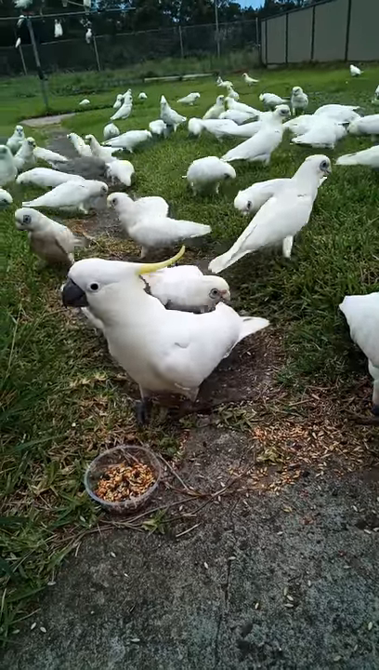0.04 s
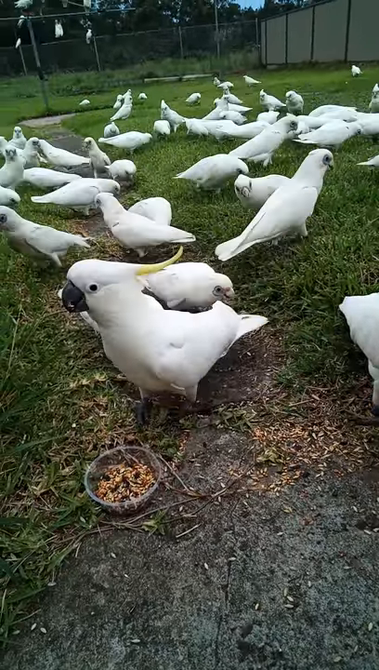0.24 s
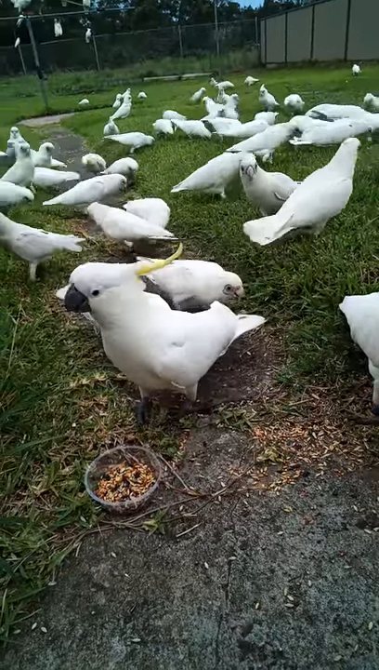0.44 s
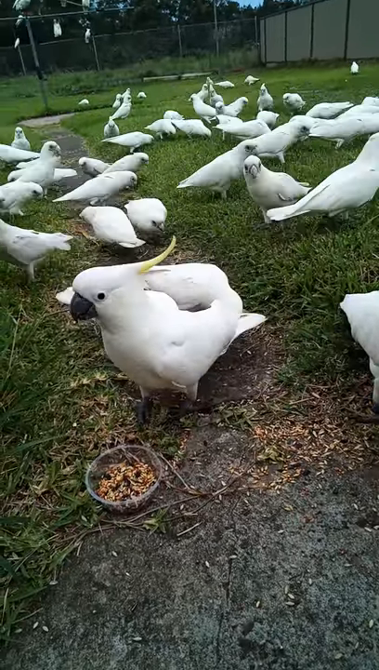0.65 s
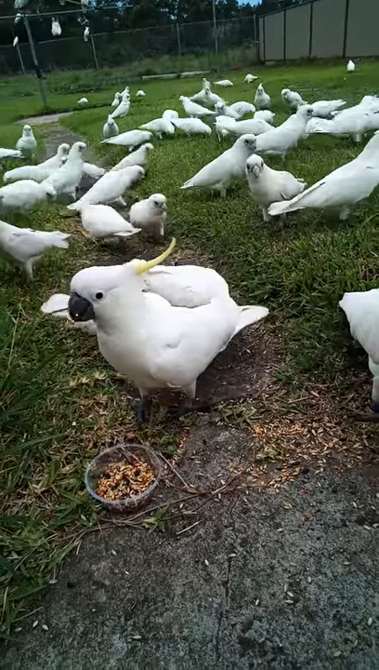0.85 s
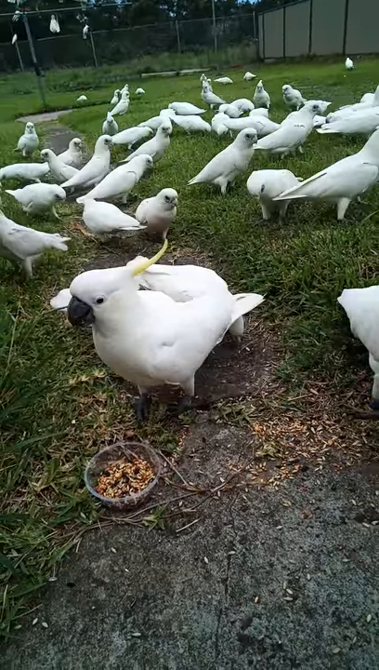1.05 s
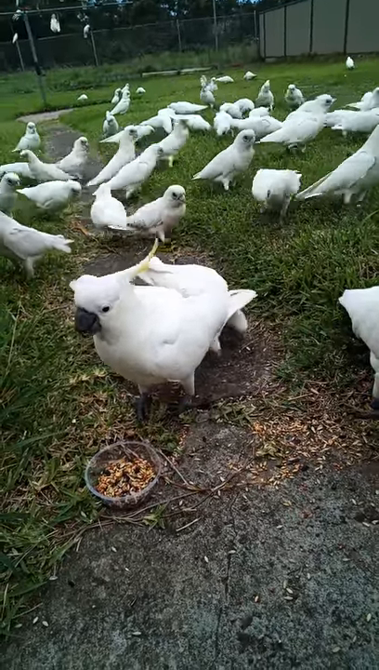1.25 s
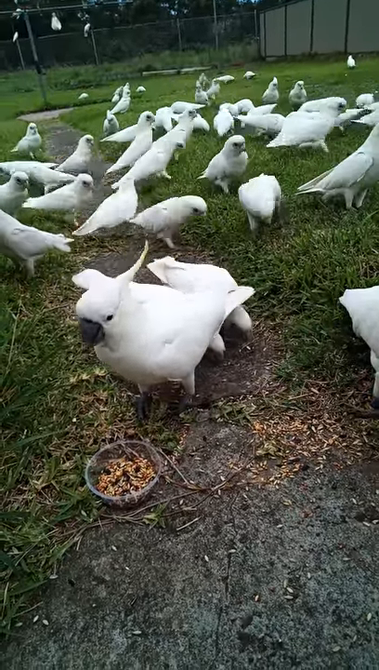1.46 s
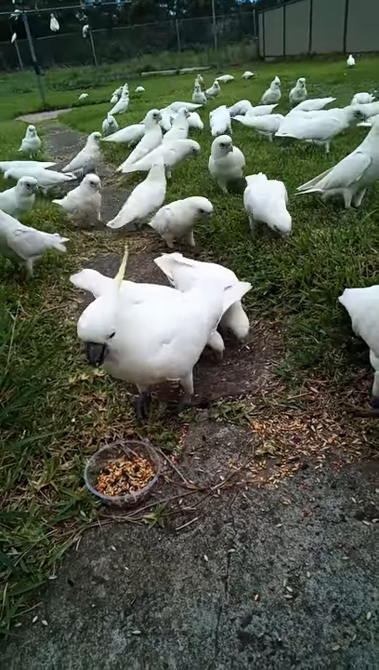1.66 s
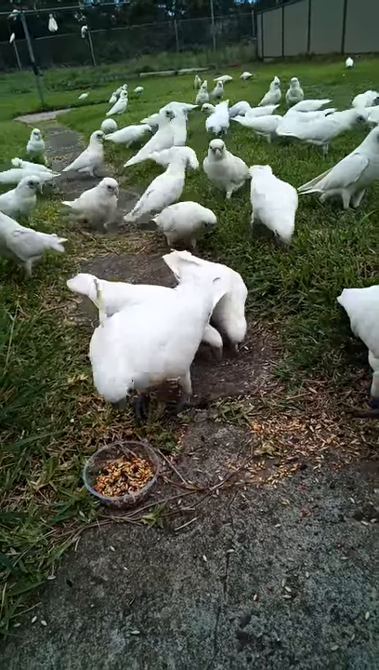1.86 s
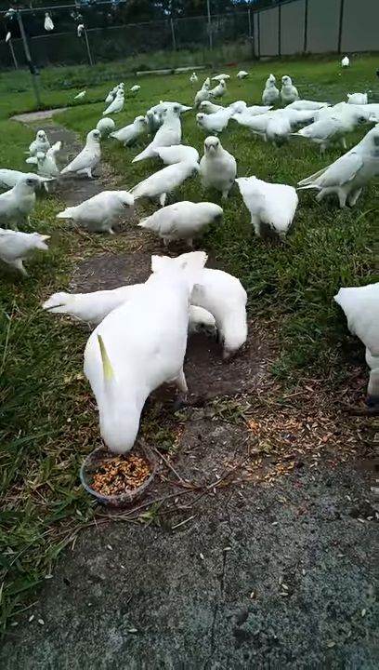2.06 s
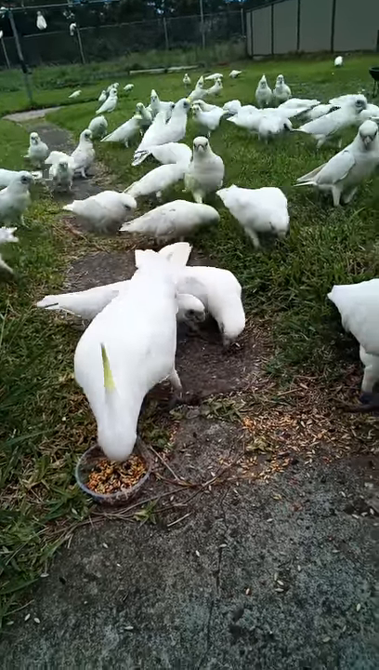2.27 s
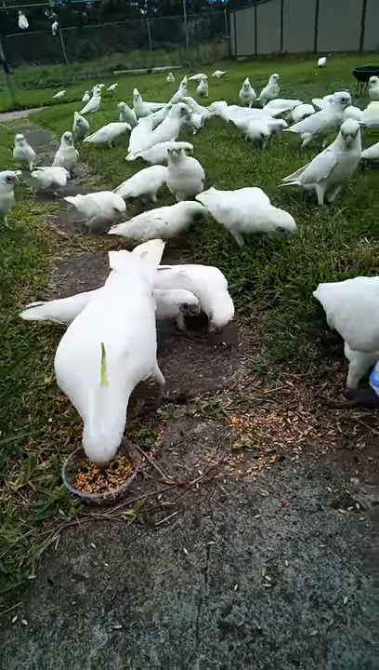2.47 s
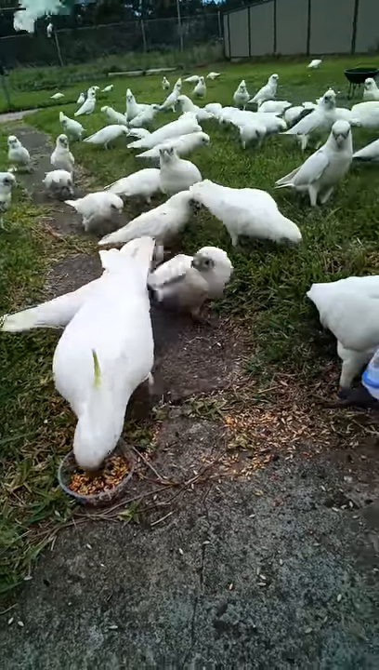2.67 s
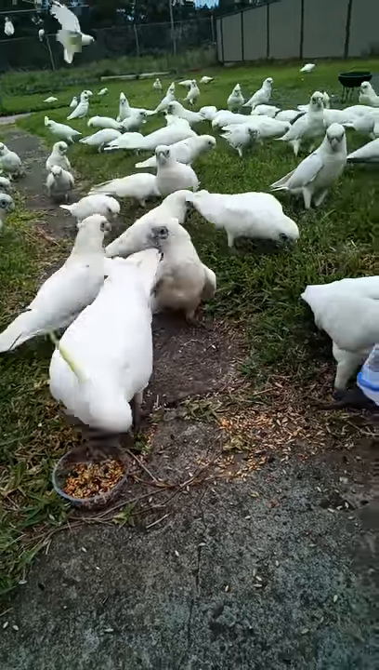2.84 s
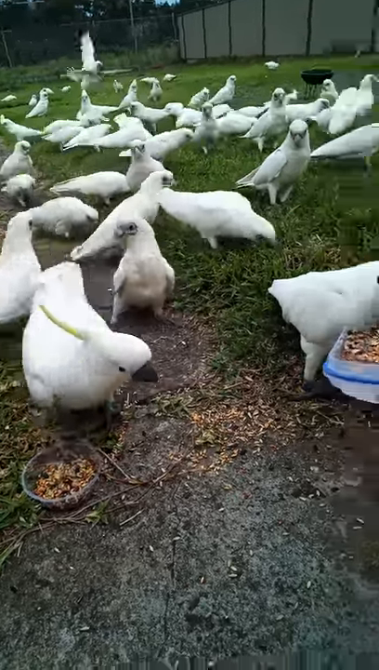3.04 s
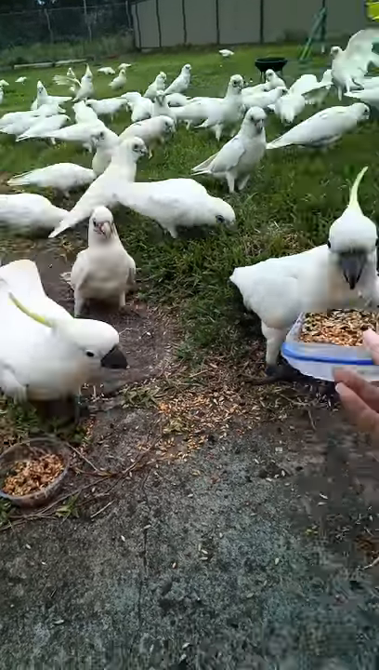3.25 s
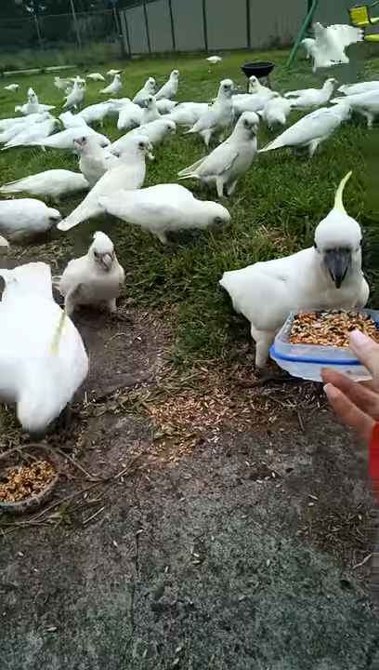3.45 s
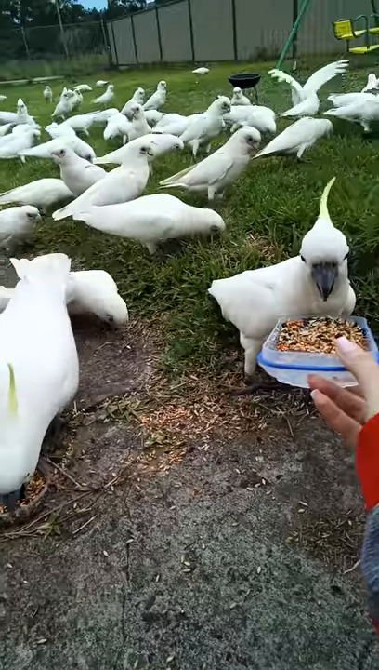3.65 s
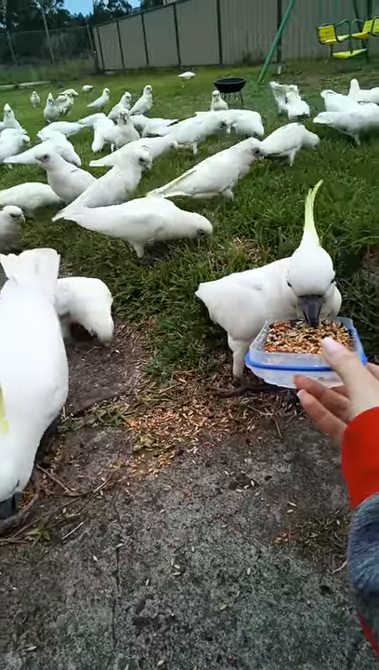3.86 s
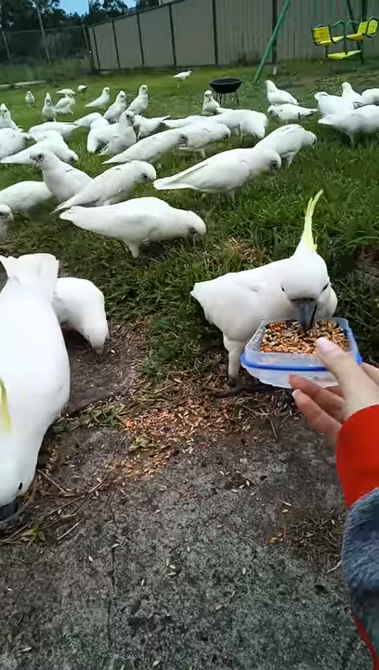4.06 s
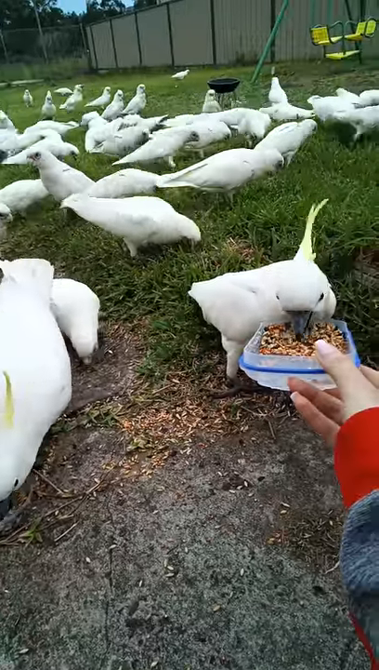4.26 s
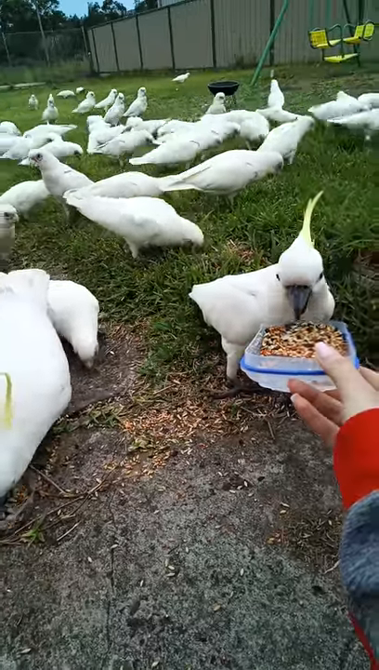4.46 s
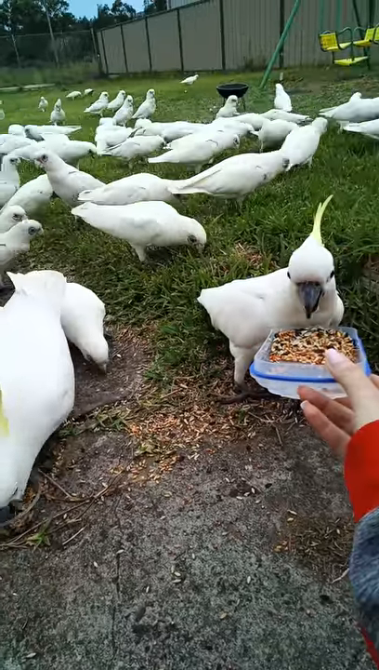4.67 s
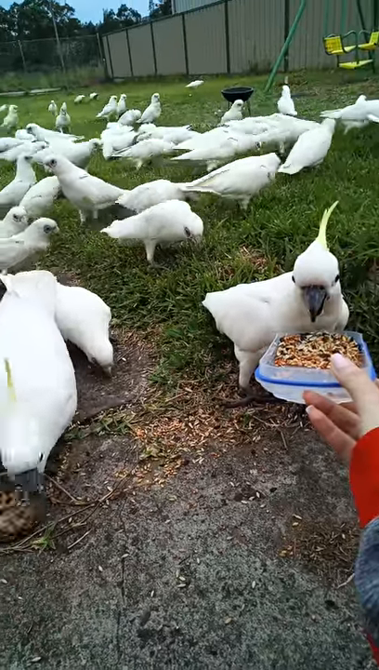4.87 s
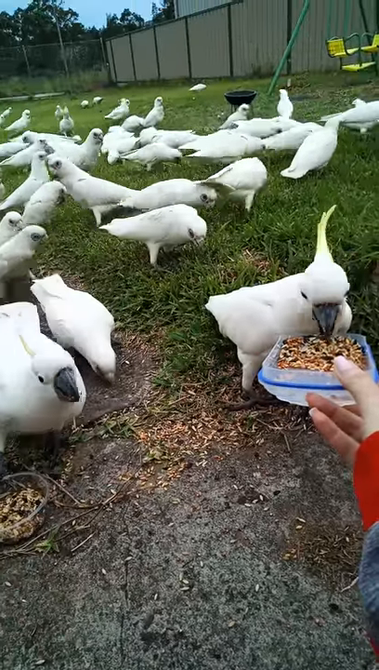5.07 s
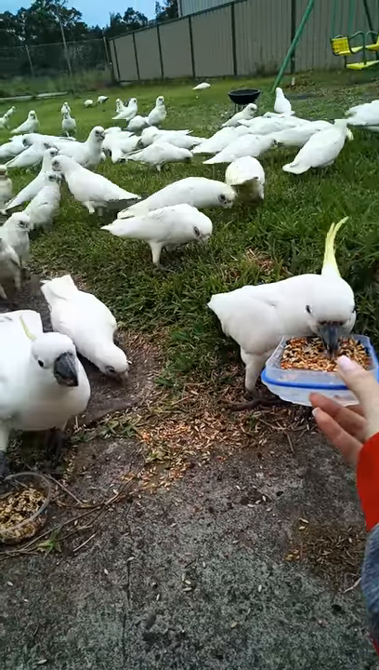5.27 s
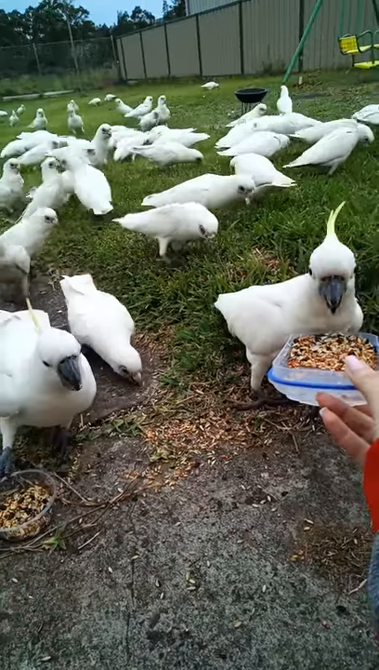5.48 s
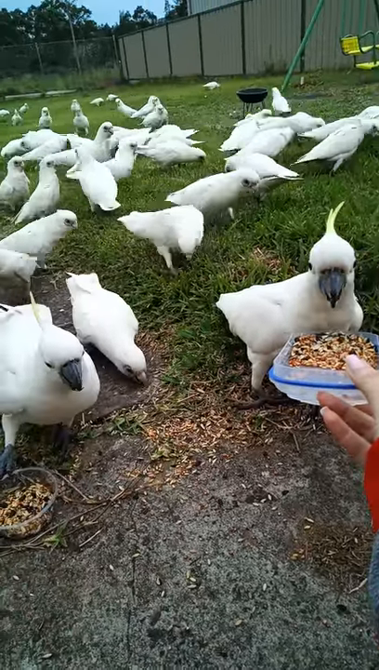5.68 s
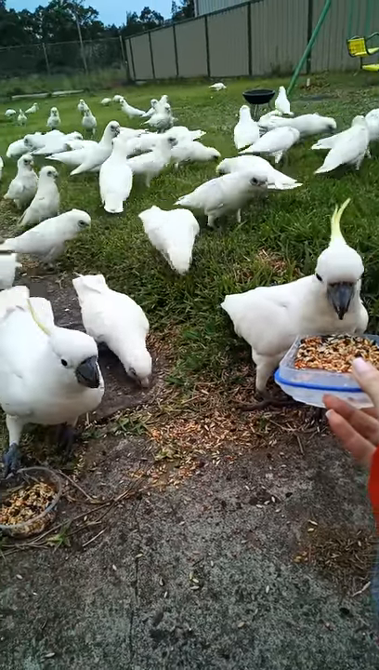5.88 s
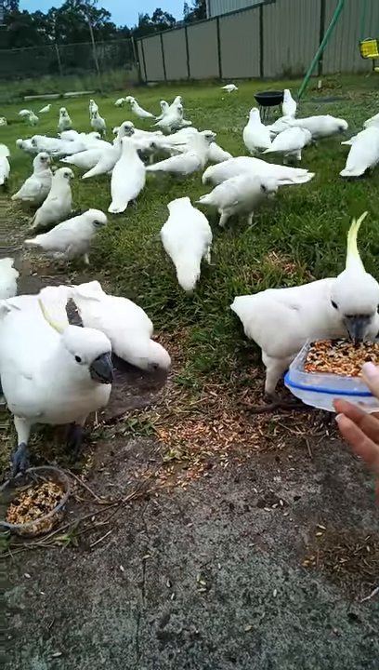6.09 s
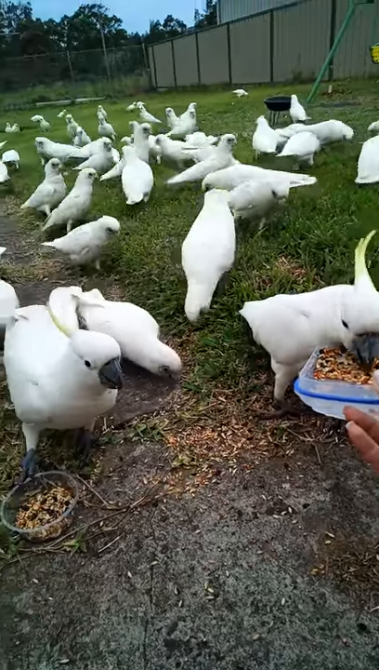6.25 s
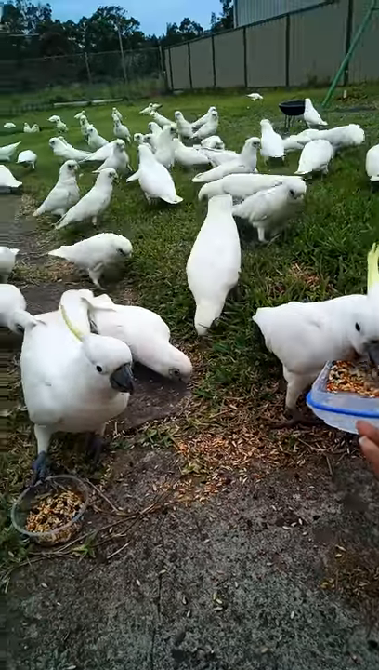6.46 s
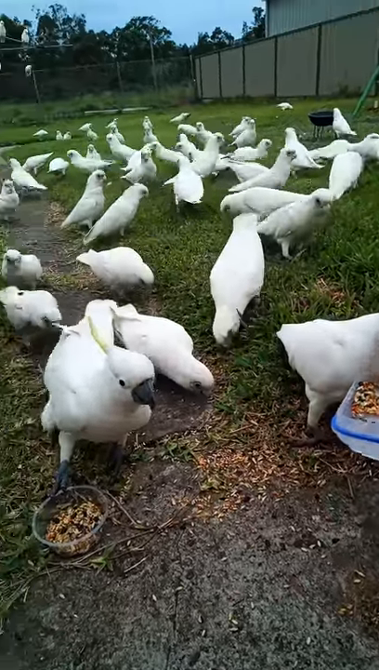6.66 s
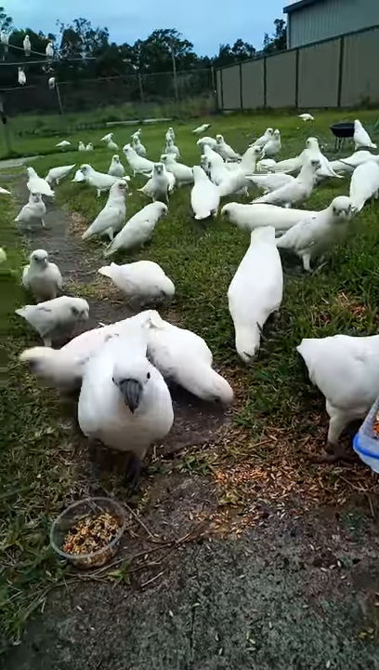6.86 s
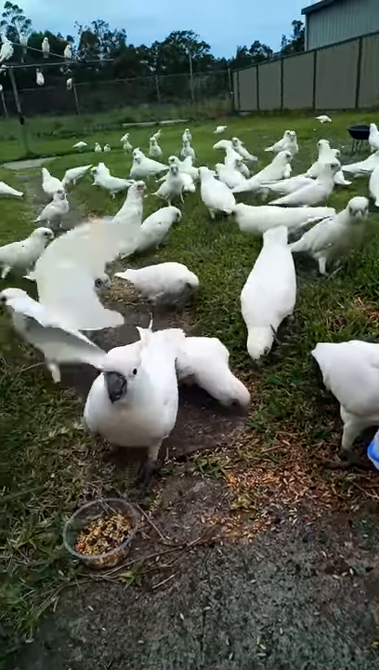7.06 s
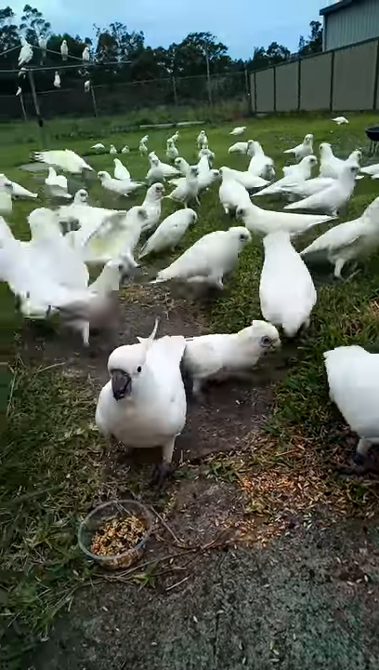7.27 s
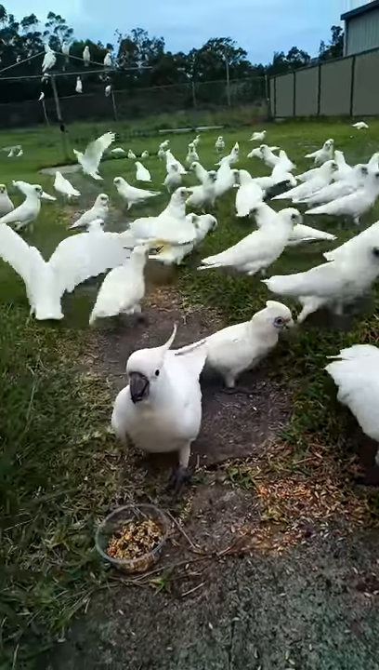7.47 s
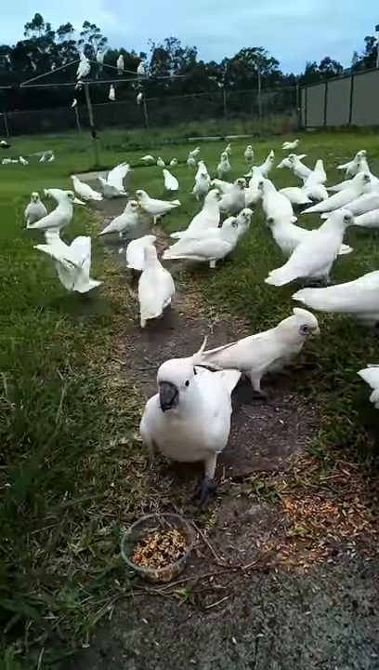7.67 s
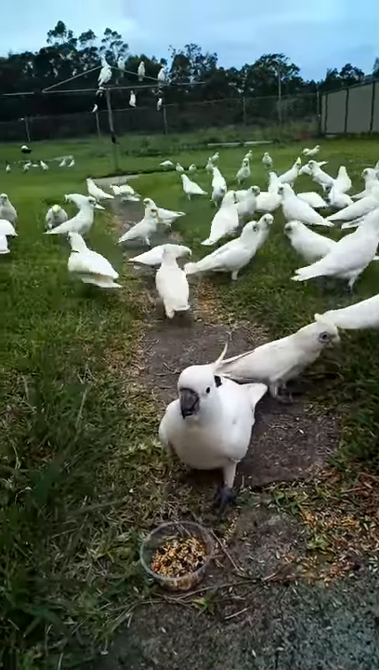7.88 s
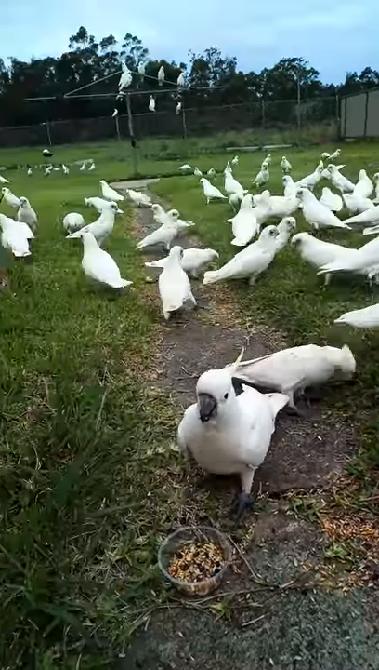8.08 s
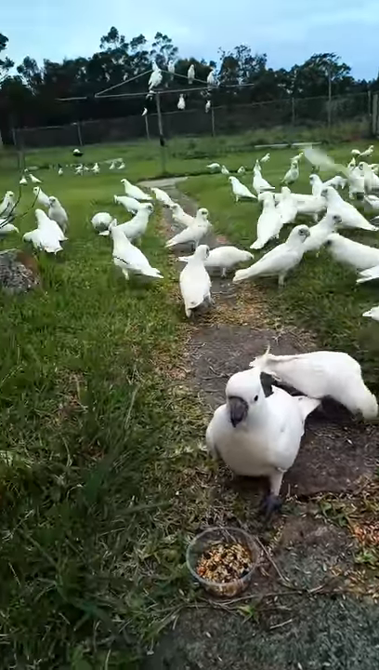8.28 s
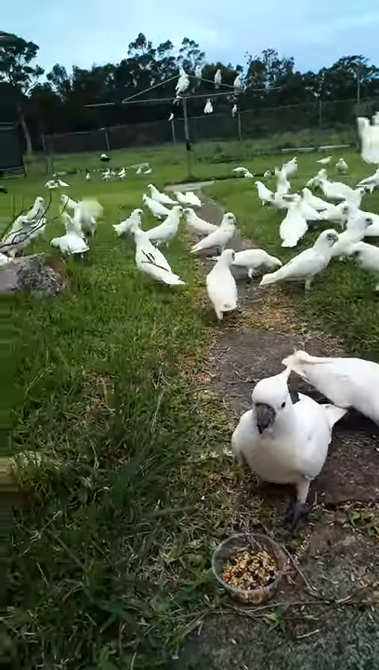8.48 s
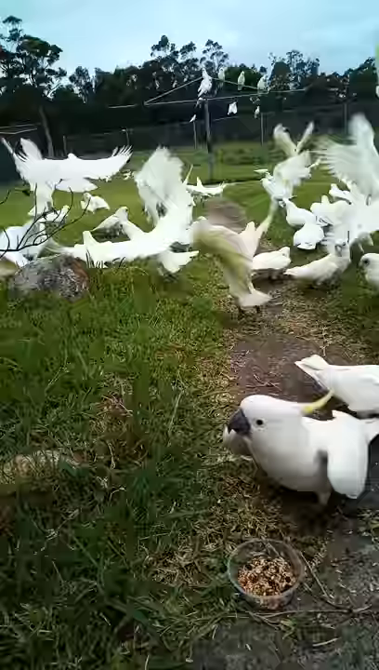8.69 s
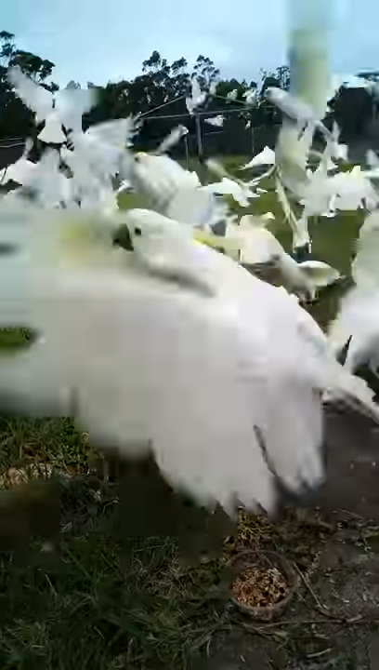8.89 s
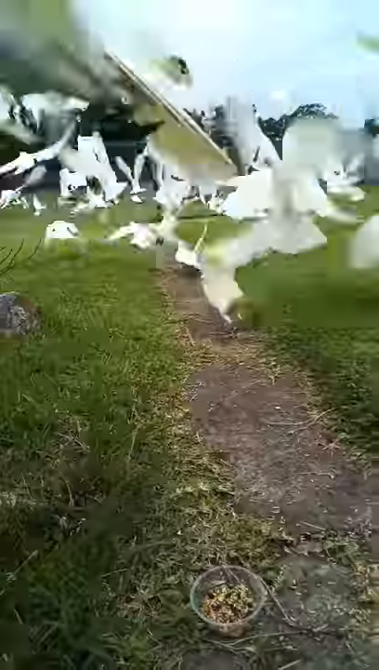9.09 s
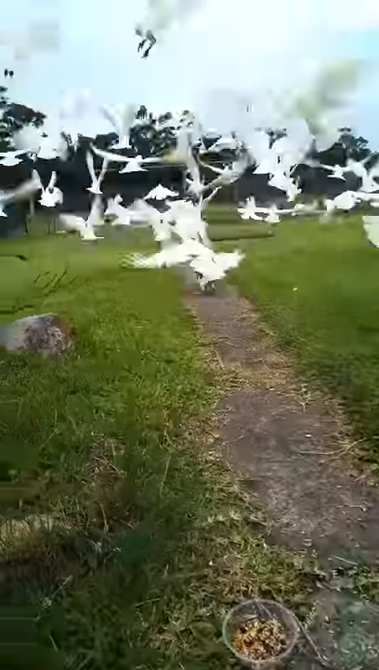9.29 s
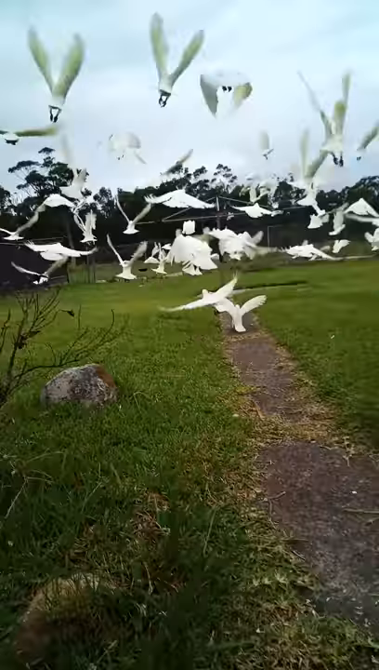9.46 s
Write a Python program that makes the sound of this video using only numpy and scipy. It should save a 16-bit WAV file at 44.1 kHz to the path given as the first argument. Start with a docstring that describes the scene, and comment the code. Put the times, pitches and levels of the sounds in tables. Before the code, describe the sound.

Sparse beak clicks, a brief nasal chatter and harsh parrot screeches outdoors, ending in a sudden loud rush of flapping wings past the microphone.

```python
"""On a back lawn, a flock of cockatoos feeds: beaks crack seed, one bird chatters, others screech near and far.
Voices are pulse trains filtered by resonances; seed cracks and wing claps are bursts of ringing noise.
Feathers rustle as grainy noise while birds shuffle and hop, then the flock bursts up with clapping wings.
Downdraught from birds passing close buffets the microphone; house, sheds and trees return a faint echo."""
import sys
import numpy as np
from scipy import signal
from scipy.fft import rfft, irfft, next_fast_len
from scipy.io import wavfile
from scipy.ndimage import uniform_filter1d

SR = 44100
rng = np.random.default_rng(int(sys.argv[2]) if len(sys.argv) > 2 else 0)


def wav_out(sig):
    """Save sig, one row per channel (or a flat mono array), as 16-bit PCM at SR to the path in sys.argv[1]."""
    wavfile.write(sys.argv[1], SR, np.round(np.clip(np.atleast_2d(sig).T, -1, 1) * 32767).astype(np.int16))


N = 420273
T = np.arange(N) / SR

# Spectra list frequency_hz, relative_db; a base_db is a level before the trims in its function.
# Open air of the yard: frequency_hz, relative_db
YARD_SPECTRUM = [(18, -39.5), (30, -12.5), (97, 2.5), (156, -4.5), (284, -3.5), (399, -9.5), (1400, -7.5),
                 (1910, -16), (2910, -14.5), (3780, -19), (5450, -38.5), (7260, -30.5), (8720, -32),
                 (15500, -36.5)]
# Many far beaks pecking: frequency_hz, relative_db
PECK_SPECTRUM = [(600, -6), (1200, 6.5), (3200, 0), (5400, -16.5), (7300, -7), (11000, -25.5)]
YARD_DB = -65.5

# Level of the low background rumble: time_s, base_db
RUMBLE_LEVEL = [(0, -59), (.16, -73), (.69, -72), (.8, -61.5), (1.35, -70.5), (1.87, -62), (2.24, -71.5),
                (2.35, -55), (3.51, -62), (3.63, -82), (3.77, -56.5), (4.1, -63.5), (4.9, -65),
                (5.0, -76.5), (6.22, -68.5), (6.4, -58), (7.25, -55.5), (7.55, -73.5), (8.3, -63)]
# Draught under the rising flock: time_s, base_db
DRAUGHT_LEVEL = [(8.3, -65.5), (8.4, -57), (8.68, -41), (8.76, -30), (8.892, -28.5), (8.984, -24),
                 (9.286, -31), (9.406, -29), (9.53, -32.5)]
# Low rumble: frequency_hz, relative_db
RUMBLE_SPECTRUM = [(25, -30.5), (50, -15), (85, 0), (150, -0.5), (300, 0), (450, -11), (800, -18.5),
                   (1500, -23.5)]
# Puffs of downdraught at the microphone: centre_s, base_db, width_s
GUSTS = [(6.385, -54, .025), (6.72, -54, 0.027), (6.879, -50.5, 0.036), (7.08, -42, 0.017),
         (7.178, -48, 0.039), (7.71, -50.5, .03), (9.069, -14.5, 0.0044), (9.086, -6, .0043),
         (9.149, -5.5, .0083), (9.162, -15.5, .0071), (9.197, -16, .013), (9.29, -17.5, .01),
         (9.345, -12, .011), (9.371, -7.5, .011), (9.41, -7.5, .01), (9.443, -19, .011),
         (9.467, -13.5, .0062)]
# Buffeting in a gust: frequency_hz, relative_db
BUFFET_SPECTRUM = [(25, -32.5), (55, -8.5), (120, 6), (170, 0.5), (330, -1.5), (500, -6), (800, -19.5),
                   (1400, -49.5), (2500, -72)]
# Bright eddies of the hardest gusts: frequency_hz, relative_db
EDDY_SPECTRUM = [(200, -9.5), (500, 8.5), (950, 8.5), (1500, -9), (2500, -35), (6000, -57)]

# Distant screeches: start_s, length_s, level_db, top_partial_hz
FAR_CALLS = [(-.09, 0.2, -54, 2898), (.87, 0.095, -59.5, 3200), (1.54, .14, -53, 3900),
             (1.775, .06, -58.5, 4000), (2.006, 0.16, -56.5, 3900), (3.03, 0.29, -45.5, 3450),
             (3.199, .31, -48.5, 3600), (3.99, 0.13, -68, 3990), (7.94, 0.42, -61, 2850)]
# Distant throats: frequency_hz, relative_db
FAR_THROAT = [(500, -24), (1100, -6), (2000, -6.5), (2800, 0), (3700, -3), (4500, -23), (7000, -23.5),
              (10000, -41.5)]
# Thin whistles: start_s, length_s, start_hz, end_hz, level_db
WHISTLES = [(1.598, .2, 1710, 1600, -68), (7.779, 0.072, 2874, 2860, -59), (7.841, 0.027, 2990, 3650, -59),
            (8.464, 0.19, 2860, 3000, -60)]
# Echo tails: frequency_hz, relative_db
ECHO_SPECTRUM = [(150, -15.0), (1000, 6), (3200, 1), (5000, 5), (12000, -31.5)]

# Beaks cracking seed: start_s, base_db, cavity_hz, snap_relative_db, treble_relative_db
CRACKS = [(.237, -50.5, 1050, -2, -26), (.254, -46, 1370, -8, -17), (.41, -50.5, 1340, -10, -11),
          (.42, -48.5, 1300, -12, -8), (.569, -44, 1270, -30, -35), (1.135, -37.5, 1280, -11, -30),
          (1.143, -42, 1250, -4.5, -14), (1.282, -45, 790, -10, -14), (1.392, -43.5, 1330, -17, -18),
          (1.483, -48, 860, 3.5, -16.5), (1.502, -42.5, 820, -20, -38), (1.553, -37.5, 1030, -5, -36),
          (2.031, -54, 1100, -8, -10), (2.079, -43.5, 820, -9, -32), (2.292, -49.5, 1120, -6, -11),
          (2.922, -38, 885, 3, -10.5), (3.043, -45.5, 1130, -4, -1), (3.061, -54, 900, 2, 3),
          (3.264, -38.5, 1300, -9, -8.5), (3.399, -36.5, 830, -13, -10.5), (3.454, -44.5, 1270, -15, -14.5),
          (3.791, -45.5, 1120, -11, -24), (4.488, -40.5, 1205, 4, -16.5), (4.526, -55, 1330, -5.5, -13),
          (5.456, -46, 1125, 1.5, -8), (5.663, -45.5, 1260, -5, -18), (5.681, -41, 1120, -7, -24),
          (6.605, -41.5, 1280, -5.5, -19), (6.793, -49, 711, -23, -12), (7.553, -50.5, 1216, -3, -37),
          (7.793, -36.5, 1090, -11, -14), (7.832, -45.5, 826, 0.5, -24)]
# Splintering husk: frequency_hz, relative_db
SNAP_SPECTRUM = [(1200, -14.5), (2200, 8.5), (3300, 3.5), (4500, -10), (6000, -23)]
# Treble tick of a crack: frequency_hz, relative_db
TICK_SPECTRUM = [(3500, -27), (6000, 5), (7400, 7), (10000, -10.5), (12500, -8.5), (15000, -10)]

# Notes of the nasal chatter: centre_s, half_width_s, pitch_hz, base_db, upper_harmonics_db
CHATTER_NOTES = [(.675, .02, 742, -50.5, -7), (.755, .022, 742, -42, -18.5), (.802, .019, 652, -47.5, -11),
                 (.86, 0.017, 648, -34.5, -30)]
# Nasal throat: frequency_hz, relative_db
NASAL_THROAT = [(400, 3), (650, -3), (1350, 4.5), (2000, 1), (2550, -11), (3200, 2.5), (4200, -10),
                (5200, -34), (6300, -33), (9000, -47)]
# Between notes the voice sinks to a low, bright drone
DRONE_HZ, DRONE_BASE_DB, DRONE_UPPER_DB = 590, -48.5, -5
CHATTER_START_S, CHATTER_ATTACK_S, CHATTER_HOLD_S, CHATTER_RELEASE_S = 0.6585, 0.024, 0.19, 0.013

# Near screeches: start_s, attack_s, hold_s, release_s, level_db, top_pitch_hz, pitch_sag_share,
# least_roughness (0-1), throat_hz, beak_hz, beak_db, sharpness_q, unfiltered_share
SCREECHES = [(1.806, 0.033, 0.0035, 0.016, -35, 680, .2, .8, 2600, 3900, -6, 15, .085),
             (2.292, .078, .045, .032, -20.6, 822.4, .35, .45, 2330, 3350, -4.5, 5.8, .09),
             (2.643, .056, .021, 0.033, -16.5, 777.4, .16, .45, 2300, 3306, -4.5, 10.1, 0.06)]
# Throat ahead of the two screech resonances: frequency_hz, relative_db
SCREECH_THROAT = [(300, -23.5), (520, -3.5), (850, -1.5), (1150, 6.5), (1700, -5), (2300, -2.5), (3700, 3),
                  (4300, 1), (4900, -1.5), (5700, -12.5), (6700, -5.5), (9500, -29), (10500, -36),
                  (15000, -34)]
# One short hoarse squawk: start_s, attack_s, hold_s, release_s, level_db, top_pitch_hz,
# pitch_sag_share, least_roughness (capped at 1)
SQUAWK = (7.669, .029, 0.03, 0.0242, -27, 760, 0.16, 1.1)
# Hoarse throat: frequency_hz, relative_db
RASP_THROAT = [(300, -23), (550, -15.5), (900, -2.5), (1300, -11), (1900, -2.5), (2700, -2), (3350, 2),
               (4500, -19.5), (5600, -24), (7300, -36), (9600, -27.5), (11000, -45), (15000, -49)]
# Pitch crests just after the attack and sags on either side; the voice is clearest around the hold
CREST_SHARE, ARCH_S, CLEAR_S = 1.02, .062, .012

# Dry scuffs through seed and grass: start_s, hold_s, level_db
SCUFFS = [(3.77, 0.011, -57), (4.693, .002, -46), (4.732, 0.0072, -44.5), (4.79, 0.066, -59.5),
          (4.878, 0.0018, -43), (4.993, .035, -57.5)]
# Scraped husks: frequency_hz, relative_db
HUSK_SPECTRUM = [(300, -2.5), (700, -13), (1100, -2), (2200, -6), (3300, 2.5), (4300, -11), (5500, -20.5),
                 (7200, -15.5), (10000, -29), (15000, -35)]
# Ruffles of shuffling and hopping birds: start_s, hold_s, level_db
RUFFLES = [(6.272, .012, -50.5), (6.37, .01, -60), (6.44, 0.39, -64), (6.52, 0.088, -61), (6.69, .03, -57),
           (6.85, 0.056, -57), (6.95, 0.47, -63), (7.018, .17, -57.5), (7.058, 0.018, -47.5),
           (7.226, .003, -52.5)]
# Rubbing feathers: frequency_hz, relative_db
FEATHER_SPECTRUM = [(200, 1), (450, 2.5), (800, -1.5), (1200, -1.5), (2200, -3.5), (3200, -4.5),
                    (4500, -14.5), (5500, -28), (7200, -17.5), (10000, -33.5), (15000, -31)]
# Waves of birds leaving the ground: start_s, hold_s, base_db
FLIGHT = [(8.39, 0.15, -59), (8.545, 0.13, -46), (8.69, 0.88, -44.5), (8.688, 0.1, -42),
          (8.808, 0.048, -27.5), (8.94, 0.055, -29.8), (9.22, 0.11, -48.5)]
# Rush of wings: frequency_hz, relative_db
WING_SPECTRUM = [(200, 15.5), (450, -13), (1000, 3), (1700, -1.5), (3200, 3.5), (4300, -9.5), (5500, -30.5),
                 (7000, -23.5)]
# Treble swish of wings: frequency_hz, relative_db
SWISH_SPECTRUM = [(3800, 5), (4800, 7), (5800, 0.5), (7300, 9.5), (10000, -8.5), (15500, -5)]
RUFFLE_ATTACK_S, RUFFLE_RELEASE_S = 0.019, 0.041
SCUFF_ATTACK_S, SCUFF_RELEASE_S = .026, 0.019
FLIGHT_ATTACK_S, FLIGHT_RELEASE_S = 0.029, 0.031

# Wing strokes and claps: peak_s, level_db, decay_s, hollow_pitch_hz
CLAPS = [(4.759, -51, .012, 1100), (4.898, -37, 0.0059, 1040), (6.287, -50, .01, 600),
         (6.319, -42.5, .006, 396), (6.372, -44.5, .009, 297), (6.394, -49.5, .009, 866),
         (6.552, -50, .011, 770), (6.633, -48.5, .015, 472), (7.031, -41.5, .012, 495),
         (7.077, -31.5, .017, 907), (8.567, -30.5, .0055, 1110), (8.715, -17, .007, 1000),
         (8.767, -24, 0.00502, 1020), (8.842, -16, 0.00432, 1130), (8.856, -28, .006, 1195),
         (8.906, -12.5, .003, 1040), (8.967, -31, .015, 1180), (8.991, -29, .013, 1500),
         (9.051, -30, .005, 2780), (9.104, -24.5, .005, 1170)]
# Slap of a wing: frequency_hz, relative_db
SLAP_SPECTRUM = [(150, -8), (500, 1), (1200, 3), (3300, 7), (5500, -18.5), (7300, -13.5), (11000, -38),
                 (15000, -31)]
CLAP_RISE_SHARE = .3  # rise time over decay time: slower-fading strokes also start more slowly

TOP_HZ = 15800  # edge of the microphone's treble


def undb(db):
    """Decibel definition: amplitude ratio is 10 to the power dB/20."""
    return 10 ** (np.asarray(db) / 20)


def unit(x):
    """Normalisation by mean power: scale to rms 1."""
    return x / np.sqrt(np.mean(x ** 2) + 1e-20)


def envelope(rows):
    """Amplitude modulation: gain of a level curve linear in dB, fading to silence outside its span."""
    times, levels_db = np.transpose(rows)
    outside = np.maximum(np.maximum(times[0] - T, T - times[-1]), 0)
    return undb(np.interp(T, times, levels_db)) * np.clip(1 - outside / 0.012, 0, 1)


def colour(x, points):
    """Linear filtering: multiply the spectrum by a (Hz, dB) curve; rms 1."""
    hz, db = np.transpose(points)
    size = next_fast_len(len(x))
    log_f = np.log(np.arange(size // 2 + 1) * SR / size + 1)
    # beyond the end points the response falls steadily with log frequency
    skirts = np.maximum(np.log(hz[0]) - log_f, 0) + np.maximum(log_f - np.log(hz[-1]), 0)
    response = undb(np.interp(log_f, np.log(hz), db) - 20 * skirts)
    return unit(irfft(rfft(x, size) * response, size)[:len(x)])


def noise(size=N):
    """Gaussian white noise: equal mean power at all frequencies."""
    return rng.standard_normal(size)


def walk(rate):
    """Band-limited chance: random points, `rate` a second, joined by straight lines; rms 1."""
    return unit(np.interp(T * rate, np.arange(N // 4), rng.uniform(-1, 1, N // 4)))


def ring(x, hz, q):
    """Resonance: a damped mode passes a band around its own frequency."""
    return signal.lfilter(*signal.iirpeak(hz, max(q, .6), fs=SR), x)


def burst(at, rise, decay):
    """Damped impulse: swell to a peak at time `at`, then fall exponentially; (samples, gain)."""
    span = slice(max(int((at - 4 * rise) * SR), 0), int((at + 8 * decay) * SR))
    t = T[span] - at
    return span, np.exp(np.where(t < 0, -(t / rise) ** 2, -t / decay))


def swell(start, attack, hold, release):
    """Forced onset and free decay: gain eases up to 1, holds and dies away exponentially."""
    t = T - start
    onset = np.sin(np.pi / 2 * np.clip(t / attack, 0, 1)) ** 2
    return onset * np.exp(-np.clip((t - attack - hold) / release, 0, 20))


def even(x):
    """Running normalisation: hold short-term rms near 1 for a level curve to shape."""
    return x / np.sqrt(np.abs(uniform_filter1d(x ** 2, size=700)) + 1e-9)


def grounded(x, lag, share):
    """Comb interference: the same sound arrives again a moment later, off the ground."""
    return (x + share * np.interp(T - lag, T, x)) / np.sqrt(1 + share ** 2)


def scattered(x):
    """All-pass dispersion: bodies and ground close by smear each pulse without changing its colour."""
    for lag in (29, 67, 107):  # samples
        taps = np.zeros(lag + 1)
        taps[0], taps[-1] = 1, -.5
        x = signal.lfilter(taps[::-1], taps, x)
    return x


def syrinx(hz, rough, jitter=0.052, flutter=0.31, hiss=0.61):
    """Self-oscillation: membrane pulses; when forced they stumble and let turbulent air through."""
    phase = 2 * np.pi * np.cumsum(hz * (1 + jitter * rough * walk(650))) / SR
    pulses = np.zeros(N)
    wraps = np.flatnonzero(np.diff(phase // (2 * np.pi)) > 0)
    # share each pulse between two samples to place it between them
    late = phase[wraps + 1] % (2 * np.pi) / (phase[wraps + 1] - phase[wraps])
    pulses[wraps], pulses[wraps + 1] = late, 1 - late
    turbulence = noise() * (1 + np.cos(phase)) * hiss * rough
    return (unit(pulses - pulses.mean()) + turbulence) * np.exp(flutter * rough * walk(380))


def yard(peck_db=-76, peck_decay=0.0046):
    """Superposition of random sources: quiet open air and the faint pecking of many far beaks."""
    pecks = (rng.random(N) < 25 / SR) * np.exp(.5 * noise())  # about 25 a second
    pecks = signal.lfilter([1], [1, -np.exp(-1 / (peck_decay * SR))], pecks) * noise()
    open_air = colour(noise(), YARD_SPECTRUM) * undb(1.7 * walk(6.9))
    return undb(YARD_DB) * open_air + undb(peck_db) * colour(pecks, PECK_SPECTRUM)


def rumble_and_gusts(rumble_db=-1, waver_db=1.5, draught_db=1, buffet_db=-1.0, eddy_db=-6, push_db=3,
                     push_s=.0013):
    """Turbulent pressure: gusts off close wings, each with a sharp push at its core, over a low background rumble."""
    level = undb(rumble_db + waver_db * walk(9.9)) * envelope(RUMBLE_LEVEL)
    level = level + undb(draught_db) * envelope(DRAUGHT_LEVEL)
    gust = np.sqrt(sum(undb(2 * db) * np.exp(-((T - at) / width) ** 2) for at, db, width in GUSTS))
    push = np.zeros(N)
    for at, db, width in GUSTS:
        inside = np.abs(T - at) < .01
        u = (T[inside] - at) / push_s
        push[inside] += undb(db + push_db) * (1 - 2 * u ** 2) * np.exp(-u ** 2)
    rumble = level * colour(noise(), RUMBLE_SPECTRUM)
    buffet = undb(buffet_db) * gust * even(colour(noise(), BUFFET_SPECTRUM))
    # the steep power leaves bright eddies mainly to the hardest gusts
    eddies = undb(eddy_db) * gust ** 1.98 * colour(noise(), EDDY_SPECTRUM)
    return rumble + push + buffet + eddies


def far_birds(core_db=-1):
    """Harmonic reinforcement: hoarse far screeches with a strong partial rising as the beak opens; whistles."""
    core_hz, gain, whistles = np.full(N, 2600.), np.zeros(N), np.zeros(N)
    for at, length, db, top_hz in FAR_CALLS:
        arch = np.sin(np.pi * np.clip((T - at) / length, 0, 1)).clip(0)
        call = undb(db) * arch ** 0.74
        core_hz = np.where(call > gain, top_hz * (.72 + .28 * arch), core_hz)  # the louder call leads
        gain = np.maximum(gain, call)
    source = syrinx(core_hz / 4, 1, jitter=.075, flutter=.3, hiss=.7)
    core_phase = 2 * np.pi * np.cumsum(core_hz * (1 + .05 * walk(400))) / SR
    core = unit(walk(700) * np.sin(core_phase))
    waver = 1 + .016 * walk(350)
    for at, length, start_hz, end_hz, db in WHISTLES:
        inside = (T > at) & (T < at + length)
        u = (T[inside] - at) / length
        glide_hz = (start_hz + (end_hz - start_hz) * u) * waver[inside]
        tone = np.sin(2 * np.pi * np.cumsum(glide_hz) / SR)
        whistles[inside] += undb(db) * 2 * np.sin(np.pi * u) * tone
    return whistles + gain * unit(colour(source, FAR_THROAT) + undb(core_db) * core)


def echo(x, early_db=-15, early_t60=0.48, late_db=-23, late_t60=0.57):
    """Reverberant decay: scatter off the house close by, then a long faint tail from sheds and trees."""
    t = T[:int(1.5 * SR)]

    def tail(t60, onset):
        """Exponential decay of diffuse sound: noise losing 60 dB in t60 seconds; root energy one half."""
        h = colour(noise(len(t)), ECHO_SPECTRUM) * undb(-60 * t / t60)
        h = h * np.clip(t / onset - .3, 0, 1)
        return h / np.sqrt(np.sum(h ** 2)) / 2

    response = undb(early_db) * tail(early_t60, 0.005) + undb(late_db) * tail(late_t60, 0.084)
    return signal.fftconvolve(x, response)[:N]


def beaks(knock_db=-2, snap_db=1, knock_decay=0.0025, snap_decay=0.0023, tick_decay=0.0032):
    """Impulsive excitation: a husk splinters, and its fragments set the hollow of the beak ringing."""
    out, snap = np.zeros(N), colour(noise(), SNAP_SPECTRUM)
    tick = colour(noise() * np.exp(.7 * walk(1200)), TICK_SPECTRUM)
    for at, db, hz, snap_rel_db, tick_rel_db in CRACKS:
        span, gain = burst(at + 0.0014, .001, snap_decay)
        out[span] += undb(db + snap_db + snap_rel_db) * gain * snap[span]
        span, gain = burst(at + .002, 0.0017, tick_decay)
        out[span] += undb(db + tick_rel_db) * gain * tick[span]
        span, gain = burst(at + 0.0024, .0016, knock_decay)
        hollow = ring(noise(len(gain)), hz, 9.2) * gain
        out[span] += undb(db + knock_db) * unit(hollow) * np.sqrt(np.mean(gain ** 2))
    return out


def chatter(lower_db=-4.0):
    """Source and filter: a clear warble lifts its pitch out of a low drone and darkens as the beak closes."""
    hz, db, upper_db = DRONE_HZ, DRONE_BASE_DB, DRONE_UPPER_DB
    for at, width, note_hz, note_db, note_upper_db in CHATTER_NOTES:
        lift = np.exp(-np.abs((T - at) / width) ** 3)
        hz = hz + lift * (note_hz - DRONE_HZ)
        db = db + lift * (note_db - DRONE_BASE_DB)
        upper_db = upper_db + lift * (note_upper_db - DRONE_UPPER_DB)
    voice = colour(syrinx(hz, .21), NASAL_THROAT)
    voice = even(grounded(voice, lag=.0034, share=.22))
    upper = signal.sosfiltfilt(signal.butter(3, 2600, "high", fs=SR, output="sos"), voice)
    gain = undb(db) * swell(CHATTER_START_S, CHATTER_ATTACK_S, CHATTER_HOLD_S, CHATTER_RELEASE_S)
    return (unit(voice - upper) * undb(lower_db) + unit(upper) * undb(upper_db)) * gain


def screeches():
    """Modulation sidebands: an irregular slower flutter adds rasp between the harmonics of arched calls."""
    hz, rough = np.full(N, DRONE_HZ * 1.), np.ones(N)
    for start, attack, hold, _, _, top_hz, sag, least_rough, *_ in SCREECHES + [SQUAWK]:
        call = T >= start
        t = T[call] - start
        hz[call] = top_hz * (1 - sag * (1 - np.exp(-((t - CREST_SHARE * attack) / ARCH_S) ** 2)))
        clear = np.exp(-((t - attack - hold / 2) / (hold + CLEAR_S)) ** 2)
        rough[call] = 1 - (1 - min(least_rough, 1)) * clear
    source = syrinx(hz, rough, jitter=.065, flutter=.35, hiss=.45)
    flutter_phase = 2 * np.pi * np.cumsum(hz * (.36 + .1 * walk(160))) / SR
    source = scattered(source * (1 + .8 * rough * np.sin(flutter_phase)))
    start, attack, hold, release, db, *_ = SQUAWK
    out = even(colour(source, RASP_THROAT)) * undb(db) * swell(start, attack, hold, release)
    source = colour(source, SCREECH_THROAT)
    for start, attack, hold, release, db, *_, throat_hz, beak_hz, beak_db, q, share in SCREECHES:
        throat = ring(source, throat_hz, q)
        beak = undb(beak_db) * ring(source, beak_hz, q)
        voice = even(throat - beak + share * source)
        out = out + voice * undb(db) * swell(start, attack, hold, release)
    return out


def feathers(flight_db=1, swish_db=-17.0, grain=0.28, beat_db=3):
    """Granular friction: husks and vanes scrape in tiny grains; many unrelated wingbeats pulse the rush."""
    def scrape():
        """Amplitude-modulated noise: many small, uneven contacts."""
        return noise() * np.exp(grain * walk(900))

    def strokes(rows, attack, release):
        """Superposition of gains: one swell for each movement."""
        return sum(undb(db) * swell(start, attack, hold, release) for start, hold, db in rows)

    shuffle = colour(scrape(), FEATHER_SPECTRUM) * unit(undb(2 * walk(50)))
    shuffle = shuffle * strokes(RUFFLES, RUFFLE_ATTACK_S, RUFFLE_RELEASE_S)
    scuffs = colour(scrape(), HUSK_SPECTRUM) * strokes(SCUFFS, SCUFF_ATTACK_S, SCUFF_RELEASE_S)
    rush = undb(flight_db) * colour(scrape(), WING_SPECTRUM)
    rush = rush + undb(swish_db) * colour(scrape(), SWISH_SPECTRUM)
    wingbeats = unit(undb(beat_db * walk(110)))
    return shuffle + scuffs + rush * wingbeats * strokes(FLIGHT, FLIGHT_ATTACK_S, FLIGHT_RELEASE_S)


def claps(slap=0.32):
    """Cavity resonance: wings slap the air and each other; the pocket between gives a hollow note."""
    out, crack = np.zeros(N), colour(noise(), SLAP_SPECTRUM)
    for at, db, decay, hz in CLAPS:
        span, gain = burst(at, CLAP_RISE_SHARE * decay, decay)
        pocket = unit(ring(ring(noise(len(gain)), hz, 2.4), hz, 2.4))
        blow = gain * (.6 * pocket + slap * crack[span])
        out[span] += undb(db) * unit(blow) * np.sqrt(np.mean(gain ** 2))
    return out


def scene():
    """Superposition: close and loud birds feed the echo almost equally, distant birds somewhat less."""
    close = chatter() + grounded(beaks() + feathers(), lag=0.001, share=.15)
    loud, far = screeches() + claps(), far_birds()
    reflected = echo(0.9 * close + loud + 0.69 * far)
    return (close + loud + far + reflected + rumble_and_gusts() + yard())[None]


def record(dry):
    """Transducer limits: the microphone loses the deepest rumble, rounds the hardest peaks and cuts the top."""
    x = signal.sosfilt(signal.butter(2, 45, "high", fs=SR, output="sos"), dry)
    x = x / (1 + x ** 6) ** (1 / 6)
    return signal.sosfilt(signal.ellip(10, .2, 70, TOP_HZ, fs=SR, output="sos"), x)


dry = scene()
out = record(dry)
wav_out(out)
```